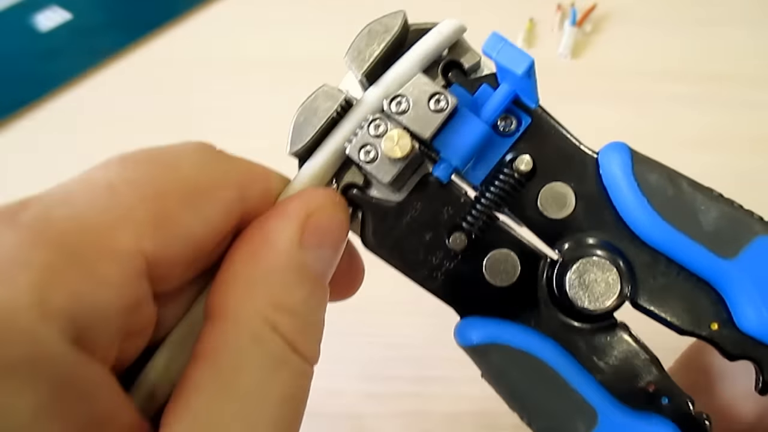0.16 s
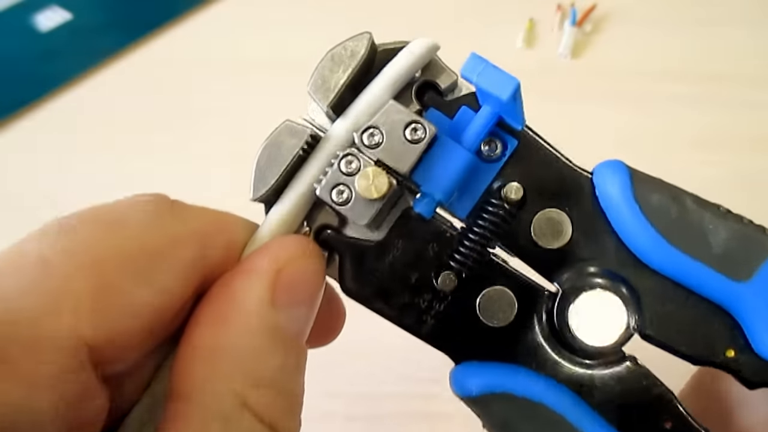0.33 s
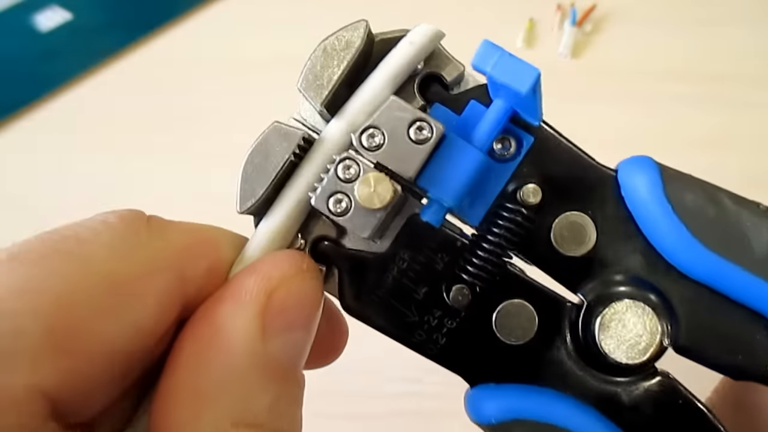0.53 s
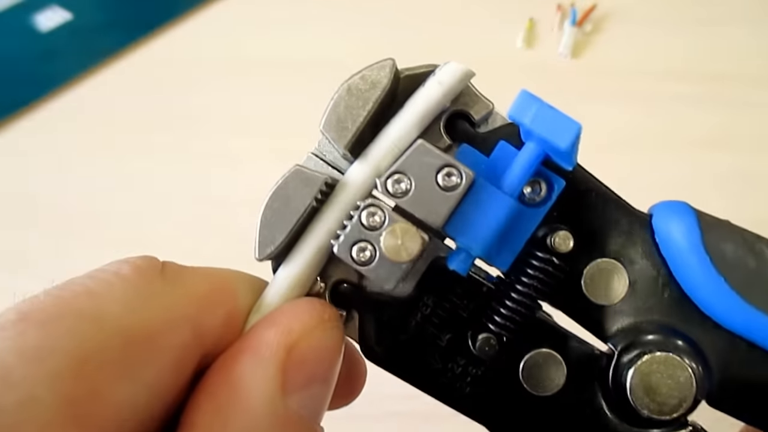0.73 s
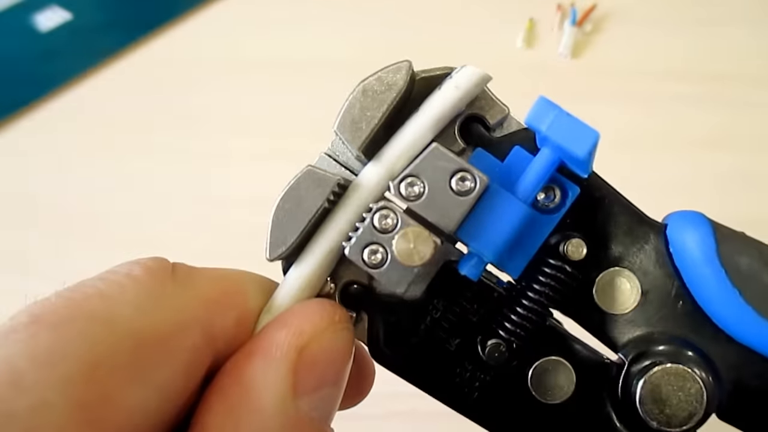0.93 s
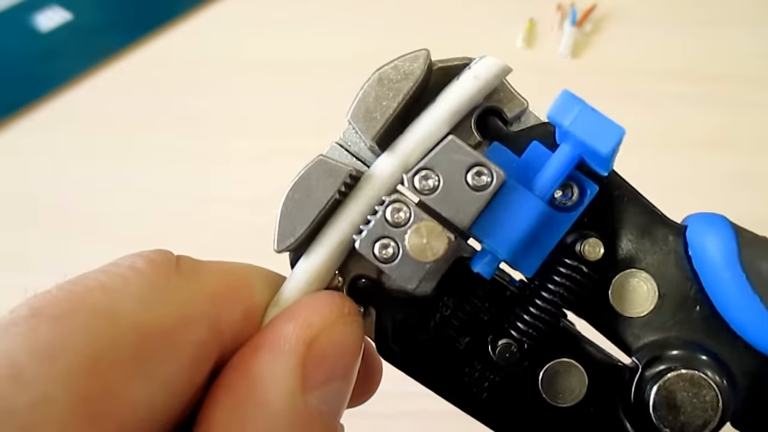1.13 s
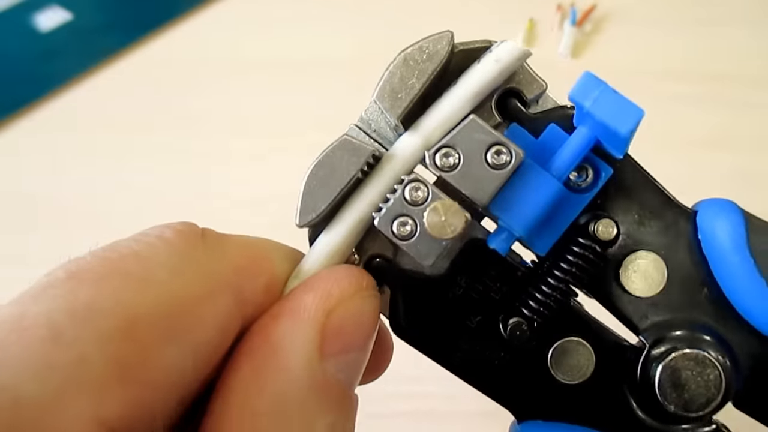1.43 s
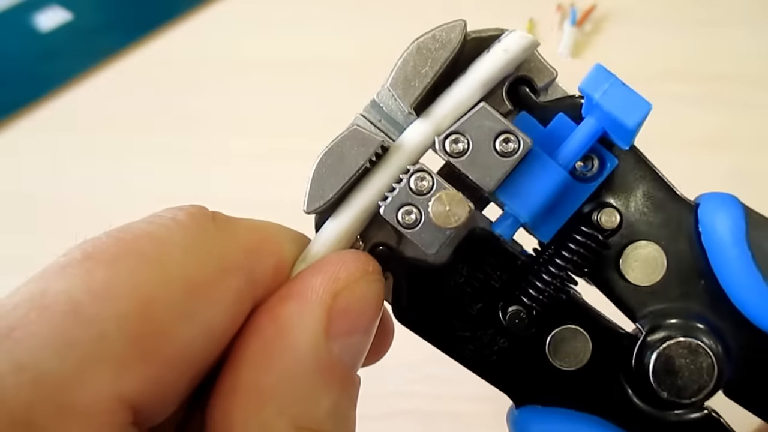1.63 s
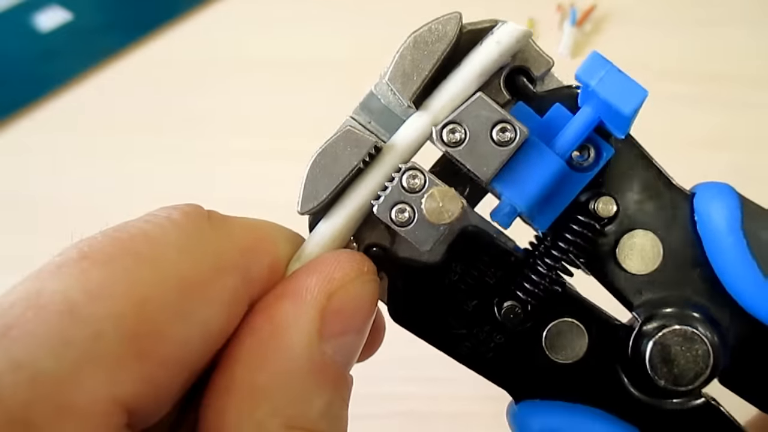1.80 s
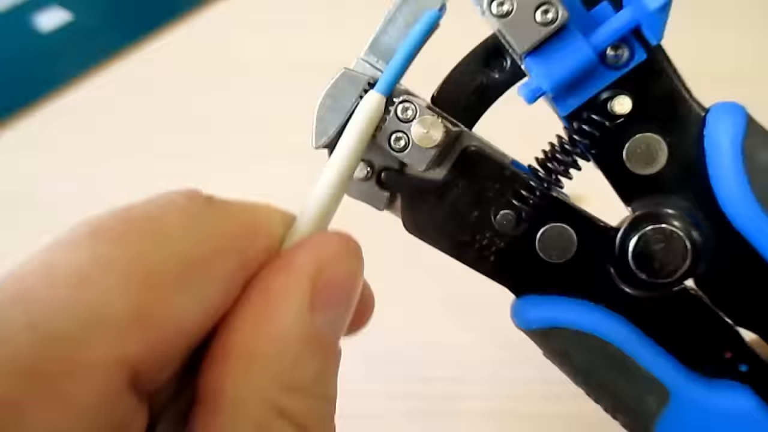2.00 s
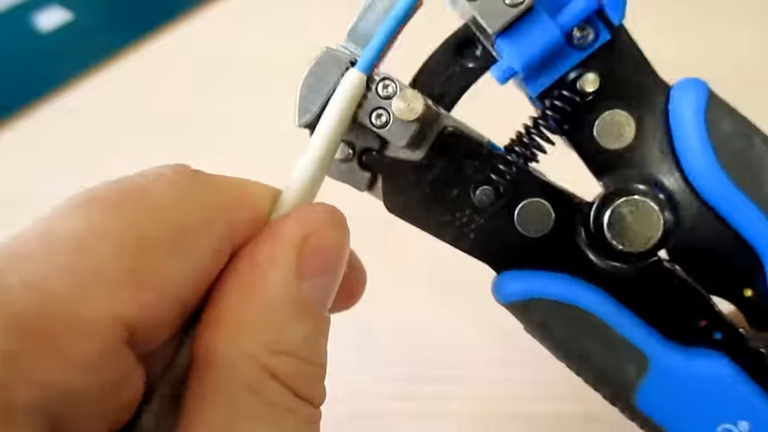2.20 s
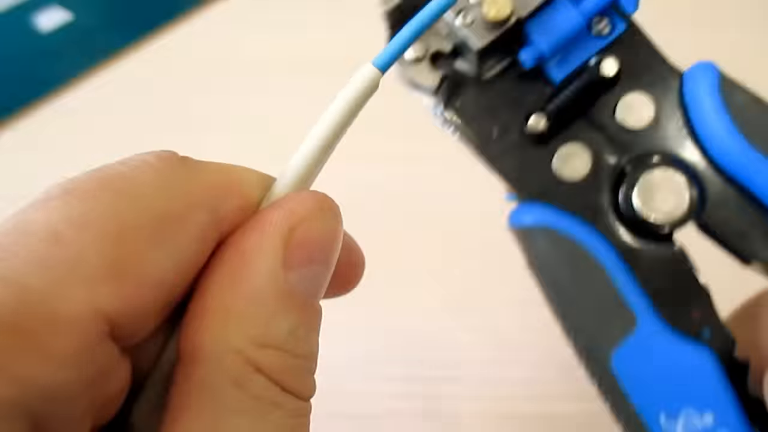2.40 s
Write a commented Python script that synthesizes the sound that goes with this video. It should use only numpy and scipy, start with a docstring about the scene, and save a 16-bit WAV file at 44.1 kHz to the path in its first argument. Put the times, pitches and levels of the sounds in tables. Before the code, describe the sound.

Wire stripper snaps open with a loud metallic clang, then clacks shut in a small room.

```python
"""Automatic wire stripper: a cable slides in and bumps the stop; the squeezed handles tick faintly.
The jacket parts and the steel jaws fly open in a rattling snap. The offcut lands on the table,
then the jaws clack shut twice. A small room answers. The snap overloads the recorder, whose
gain control ducks and holds everything after it, room noise included."""
import sys
import numpy as np
from scipy import signal
from scipy.fft import rfft, irfft, next_fast_len
from scipy.io import wavfile

SR = 44100
rng = np.random.default_rng(int(sys.argv[2]) if len(sys.argv) > 2 else 0)


def wrap_up_sound(samples):
    """Save the sound to the file named by the first command line argument, as 16-bit audio."""
    columns = np.atleast_2d(samples).T
    # keep every value between -1 and 1, then stretch to whole-number steps
    tamed = np.clip(columns, -1, 1)
    steps = np.round(tamed * 32767).astype(np.int16)
    wavfile.write(sys.argv[1], SR, steps)


N = 112454

# scrape and creak spectrum (frequency [Hz], level [dB])
SCRAPE_SPECTRUM = [(100, -8), (230, 5), (330, 7), (480, -10.5), (750, -15), (1030, 2.5), (1400, -14.5),
                   (1820, -0.5), (2050, -8), (2300, 1.5), (2650, -26), (6000, -29), (14000, -51)]
# tick and scrape-treble spectrum (frequency [Hz], level [dB])
TICK_SPECTRUM = [(500, -20), (3000, 4), (6000, 4), (9000, 2), (11500, -15), (15000, -18)]
# jaw contacts, opening (time [s], crack [dB], clang [dB], thud [dB])
OPENING_HITS = [(2.0219, -31, -30.5, -26), (2.0232, -30, -27, -25.5), (2.0292, -9.5, -16.5, -4.5),
                (2.0346, -4, -3.5, -11.5), (2.0416, -17.5, -9, -32), (2.0483, -15.5, -16.5, -39.5),
                (2.0487, -11, -14.5, -38), (2.0585, -28.5, -20, -27), (2.0934, -27, -23.5, -47)]
# jaw and slide contacts, closing (time [s], bright click [dB], dull clack [dB], thud [dB])
CLOSING_HITS = [(2.3278, -41, -48, -73), (2.3451, -18.5, -41, -48), (2.3464, -5, -22, -23),
                (2.349, -11.5, -40, -45), (2.3545, -15, -23, -49), (2.4028, -41, -26, -50),
                (2.4061, -16.5, -30, -41), (2.4068, -24.5, -8.5, -39), (2.4101, -10.5, -10, -36),
                (2.4124, -12.5, -9, -56), (2.4136, -17, -29, -46), (2.4173, -17.5, -16.5, -48)]


def amp(db):
    """Decibels to gain."""
    return 10 ** (np.asarray(db) / 20)


def unit_rms(x):
    """Scale to rms 1."""
    return x / np.sqrt(np.mean(x ** 2) + 1e-20)


def log_interp(points, hz):
    """Interpolate (frequency [Hz], value) points on a log axis."""
    knots_hz, values = np.transpose(points)
    return np.interp(np.log(hz + 1), np.log(knots_hz + 1), values)


def clock():
    """Sample times [s]."""
    return np.arange(N) / SR


def envelope(curve):
    """Gain per sample from (time [s], level [dB]) points."""
    return amp(np.interp(clock(), *np.transpose(curve)))


def filtered(x, response):
    """Zero-phase filter of gain response(hz)."""
    size = next_fast_len(2 * N)
    return irfft(rfft(x, size) * response(np.fft.rfftfreq(size, 1 / SR)), size)[:N]


def coloured(x, spectrum, size=4096):
    """Minimum-phase filter of unit energy."""
    cepstrum = irfft(np.log(amp(log_interp(spectrum, np.fft.rfftfreq(size, 1 / SR)))))
    cepstrum[1:size // 2] *= 2
    cepstrum[size // 2 + 1:] = 0
    impulse = irfft(np.exp(rfft(cepstrum)))
    return signal.fftconvolve(x, impulse / np.linalg.norm(impulse))[:N]


def low_cut(x, cutoff_hz=90):
    """A small tool radiates no deep bass."""
    return signal.lfilter(*signal.butter(2, cutoff_hz, "high", fs=SR), x)


def add(track, at_s, sound):
    """Mix in place."""
    part = track[round(at_s * SR):][:len(sound)]
    part += sound[:len(part)]


def bursts(times_s, levels_db, t60_s, ref_s=0.003, size=4096):
    """One decaying white burst per contact; level = energy spread over ref_s."""
    out = np.zeros(N)
    decay = amp(-60 * np.arange(size) / SR / t60_s)
    for at_s, db in zip(times_s, levels_db):
        bins = rfft(rng.standard_normal(size) * decay)
        burst = irfft(bins / (abs(bins) + 1e-12)) * np.sqrt(decay)
        add(out, at_s, amp(db) * np.sqrt(ref_s * SR) * burst / np.linalg.norm(burst))
    return out


def ring(modes, scatter_db=1.5):
    """Damped sines, levels scattered per strike."""
    t = np.arange(SR // 2) / SR
    return sum(amp(db + scatter_db * rng.standard_normal() - 60 * t / t60_s) * np.sin(2 * np.pi * hz * t)
               for hz, db, t60_s in modes)


def friction(peaks):
    """Friction noise through resonances, rms 1."""
    def response(hz):
        return sum(amp(db) / (1 + ((hz - peak_hz) / width_hz) ** 2) for peak_hz, width_hz, db in peaks)
    return unit_rms(filtered(rng.standard_normal(N), response))


def background(noise_db=-54.5):
    """Room noise, mains hum and a thin electrical whine."""
    noise_spectrum = [(15, -25), (25, -0.5), (92, -5.5), (123, -2), (373, -12.5), (451, -13.5), (624, -12),
                      (796, -15), (1100, -14.5), (1700, -21.5), (6210, -31), (10700, -43.5), (12200, -44.5),
                      (16000, -48)]  # (frequency [Hz], level [dB])
    electrical_tones = [(118.4, -65.5), (11795, -88)]  # (frequency [Hz], rms level [dB])
    noise = filtered(rng.standard_normal(N), lambda hz: amp(log_interp(noise_spectrum, hz)))
    hum = sum(amp(db) * np.sqrt(2) * np.sin(2 * np.pi * hz * clock()) for hz, db in electrical_tones)
    return amp(noise_db) * unit_rms(noise) + hum


def cable_slide(frame_db=-3.5, hiss_db=-2):
    """The cable rubs through frame and jaws, pings the blade and scrapes the stop."""
    slide_levels = [(0, -58), (.04, -55.5), (.06, -48.5), (.1, -47), (.15, -48.5), (.24, -47.5),
                    (.275, -51.5), (.3, -60), (.36, -68)]  # (time [s], level [dB])
    hiss_spectrum = [(60, -38.5), (130, 3), (340, -9), (520, -10.5), (750, -6.5), (1300, -12.5),
                     (2300, -15), (4000, -24), (7000, -30.5), (10000, -40), (12500, -64.5), (16000, -61)]  # (frequency [Hz], level [dB])
    frame_peaks = [(347, 10.5, 4), (673, 35, -1), (877, 12, -6), (1035, 23, -11.5), (1570, 33, -16.5)]  # (frequency [Hz], half-width [Hz], level [dB])
    jaw_levels = [(.02, -75), (.06, -57.5), (.15, -60), (.24, -55.5), (.275, -49), (.3, -67), (.36, -77)]  # (time [s], level [dB])
    jaw_peaks = [(2243, 88, 1.5), (2950, 120, -16), (5160, 52, -11.5), (6100, 67, -23), (14000, 450, -35)]  # (frequency [Hz], half-width [Hz], level [dB])
    scrapes = [(0.2601, -35.5, -12.5), (0.2743, -34, -29)]  # (time [s], level [dB], relative treble [dB])
    ping_s, ping_hz, ping_db, ping_t60_s = 0.053, 3080, -48.5, 0.047
    frame = amp(frame_db) * friction(frame_peaks)
    hiss = amp(hiss_db) * coloured(rng.standard_normal(N), hiss_spectrum)
    times_s, scrape_db, treble_db = np.transpose(scrapes)
    contacts = coloured(bursts(times_s, scrape_db, t60_s=0.035), SCRAPE_SPECTRUM)
    contacts += coloured(bursts(times_s, scrape_db + treble_db, t60_s=0.066), TICK_SPECTRUM)
    add(contacts, ping_s, ring([(ping_hz, ping_db, ping_t60_s)]))
    jaw_rub = envelope(jaw_levels) * friction(jaw_peaks)
    return envelope(slide_levels) * (frame + hiss) + jaw_rub + contacts


def hand_bump(at_s=0.2867, hz=165.8, db=-19, t60_s=0.095, rise_s=0.02):
    """The hand bumps softly as the cable stops."""
    t, out = clock(), np.zeros(N)
    swell = amp(db - 60 * t / t60_s) * (1 - np.exp(-t / rise_s))
    add(out, at_s, swell * np.sin(2 * np.pi * hz * t))
    return out


def squeeze():
    """Under load the linkage ticks and the frame creaks; the stretching jacket rasps, then parts."""
    linkage_ticks = [(.085, -60), (0.587, -60.5), (0.995, -57), (1.469, -55.5), (1.476, -59)]  # (time [s], level [dB])
    frame_creaks = [(0.734, -49), (1.599, -60)]  # (time [s], level [dB])
    rasp_levels = [(1.85, -72), (1.94, -70), (2.015, -57), (2.025, -89)]  # (time [s], level [dB])
    rasp_peaks = [(2900, 200, -5.5), (3400, 660, 2)]  # (frequency [Hz], half-width [Hz], level [dB])
    ticks = coloured(bursts(*np.transpose(linkage_ticks), t60_s=0.025), TICK_SPECTRUM)
    creaks = coloured(bursts(*np.transpose(frame_creaks), t60_s=0.054), SCRAPE_SPECTRUM)
    return ticks + creaks + envelope(rasp_levels) * friction(rasp_peaks)


def jaws_open(lever_db=-30):
    """Each contact cracks, clangs in the jaws and leaves the steel levers ringing."""
    crack_spectrum = [(30, -31), (200, -10.5), (550, -9), (900, -9.5), (1500, -12.5), (2600, -1), (4000, 3),
                      (6200, 0.5), (9000, -9.5), (12000, -15), (15000, -16.5)]  # (frequency [Hz], level [dB])
    clang_spectrum = [(300, -15.5), (1500, -17), (2050, -5.5), (2500, -1.5), (3000, -2), (3700, 1),
                      (4400, -10), (6000, -13.5), (8000, -10.5), (11000, -27.5), (15000, -40)]  # (frequency [Hz], level [dB])
    jaw_modes = [(2490, -7, 0.015), (3770, 0.5, 0.03), (6000, -6.5, 0.015), (10700, -20, 0.022)]  # (frequency [Hz], level [dB], T60 [s])
    lever_modes = [(2085, 2, 0.38), (2350, 5, 0.24), (2590, 0, .12), (3680, 6, .2), (3514, 3, .22),
                   (3600, -5, 0.19), (3811, -15.5, .26), (4382, -13, 0.16), (5000, -6, .22), (4820, -1, .2),
                   (5500, -6, .19), (6422, -10.5, .17), (6901, -19, .22), (8700, -21.5, .19)]  # (frequency [Hz], level [dB], T60 [s])
    times_s, crack_db, clang_db, _ = np.transpose(OPENING_HITS)
    out = coloured(bursts(times_s, crack_db, t60_s=0.0062), crack_spectrum)
    out += coloured(bursts(times_s, clang_db, t60_s=0.022), clang_spectrum)
    for at_s, db in zip(times_s, clang_db):
        add(out, at_s, amp(db) * (ring(jaw_modes) + amp(lever_db) * ring(lever_modes)))
    return low_cut(out)


def handle_thuds():
    """Every jaw contact jolts the handles."""
    handle_modes = [(155, -28, .035), (345, -3.5, 0.015), (600, -12.5, 0.012), (807, -6, 0.012),
                    (1040, -15.5, 0.0113)]  # (frequency [Hz], level [dB], T60 [s])
    out = np.zeros(N)
    for at_s, _, _, thud_db in list(OPENING_HITS) + list(CLOSING_HITS):
        add(out, at_s, amp(thud_db) * ring(handle_modes))
    return low_cut(out)


def offcut():
    """The stripped piece of jacket lands and bounces on the table."""
    bounces = [(2.2625, -18.5), (2.2635, -15.5), (2.2714, -25.5), (2.2747, -23.5), (2.291, -43)]  # (time [s], level [dB])
    knock_spectrum = [(30, -52), (120, -15), (350, -8), (520, 0), (720, 3), (1100, -3), (1550, -1),
                      (2100, -2.5), (2900, -0.5), (4300, -17.5), (7500, -25.5), (11000, -52), (16000, -54)]  # (frequency [Hz], level [dB])
    return coloured(bursts(*np.transpose(bounces), t60_s=0.019), knock_spectrum)


def jaws_close():
    """Released jaws and slide hit their stops in two quick clusters."""
    click_spectrum = [(30, -37), (150, -11), (600, -14.5), (1300, -12), (2200, 1.5), (3100, -9), (4500, 5),
                      (5500, -4.5), (6300, -2), (7800, -7.5), (9500, -16), (11000, -14.5), (15000, -28)]  # (frequency [Hz], level [dB])
    clack_spectrum = [(30, -36), (150, -12), (500, -31), (750, -31), (1050, -15), (1400, -7), (2200, -1.5),
                      (3150, 6), (3700, 3), (4500, -2.5), (6000, -4), (8500, -5), (11000, -25.5),
                      (15000, -27)]  # (frequency [Hz], level [dB])
    times_s, click_db, clack_db, _ = np.transpose(CLOSING_HITS)
    clicks = coloured(bursts(times_s, click_db, t60_s=0.0071), click_spectrum)
    clacks = coloured(bursts(times_s, clack_db, t60_s=0.012), clack_spectrum)
    return low_cut(clicks + clacks)


def room(x, build_s=0.005):
    """Diffuse reverberation; treble dies first."""
    decay_times = [(150, 0.65), (1000, 0.41), (3500, 0.38), (7000, 0.3), (14000, 0.26)]  # (frequency [Hz], T60 [s])
    reverb_spectrum = [(100, 5), (350, -9), (800, -1.5), (1500, 1.5), (2300, -3.5), (3700, -2.5),
                       (6000, 0.5), (14000, -2.5)]  # (frequency [Hz], level [dB])
    hz, t, bins = signal.stft(rng.standard_normal(SR * 2 // 3), SR, nperseg=256)
    decay = amp(-60 * t / log_interp(decay_times, hz)[:, None])
    tail = signal.istft(bins * decay, SR, nperseg=256)[1]
    tail *= 1 - np.exp(-np.arange(len(tail)) / SR / build_s)
    wet = signal.fftconvolve(x, tail / np.linalg.norm(tail))[:N]
    return coloured(wet, reverb_spectrum)


def scene():
    """Tool close by; table farther, so wetter. The handles radiate weakly into the room."""
    tool_send_db, handle_send_db, table_send_db = -14.5, -27, -5.5
    opening = cable_slide() + hand_bump() + squeeze() + jaws_open()
    closing, thuds, knocks = jaws_close(), handle_thuds(), offcut()
    wet = amp(tool_send_db) * (room(opening) + room(closing))
    wet += amp(handle_send_db) * room(thuds)
    wet += amp(table_send_db) * room(knocks)
    return (opening + closing + thuds + knocks + wet + background())[None]


def record(dry):
    """Gain control ducks on peaks and holds its deepest cut; clipping and a steep low-pass follow."""
    threshold_db, max_cut_db, attack_s, cutoff_hz = -11, 9, 0.013, 16200
    x = dry[0]
    over_db = np.clip(20 * np.log10(abs(x) + 1e-9) - threshold_db, 0, max_cut_db)
    held_db = np.maximum.accumulate(over_db)
    pole = np.exp(-1 / (attack_s * SR))
    cut_db = signal.lfilter([1 - pole], [1, -pole], held_db)
    clipped = np.clip(x * amp(-cut_db), -1, 1)
    return filtered(clipped, lambda hz: 1 / np.sqrt(1 + (hz / cutoff_hz) ** 100))[None]


dry = scene()
out = record(dry)
wrap_up_sound(out)
```